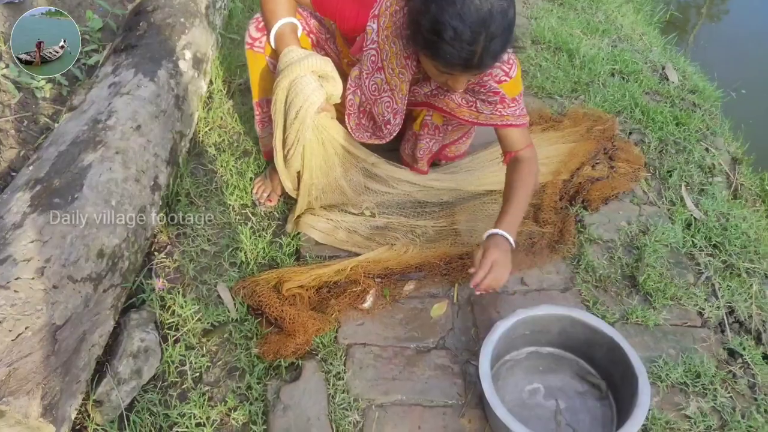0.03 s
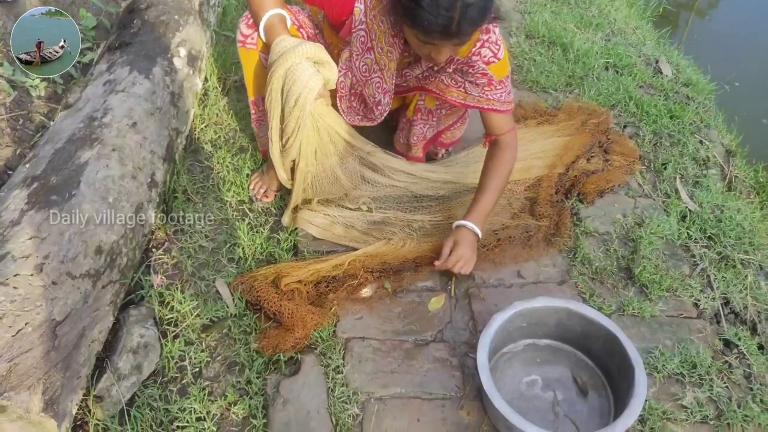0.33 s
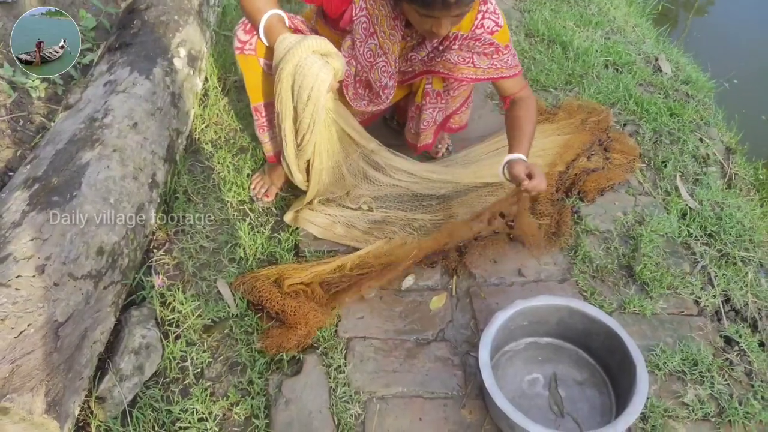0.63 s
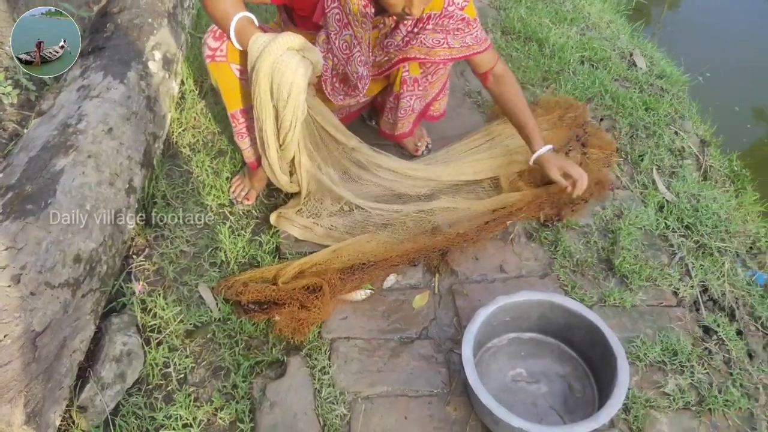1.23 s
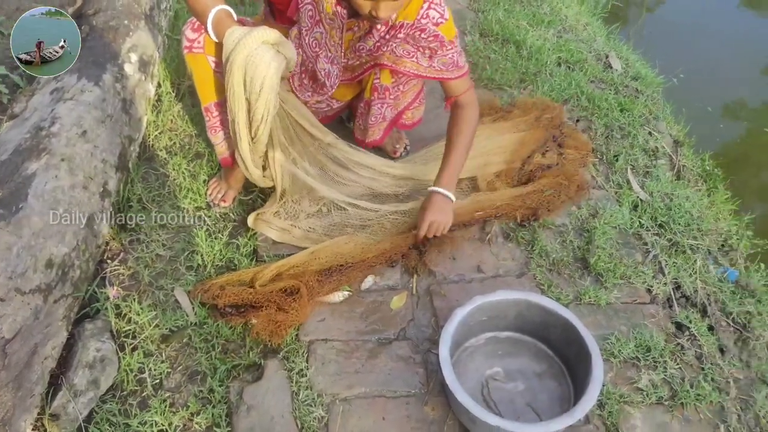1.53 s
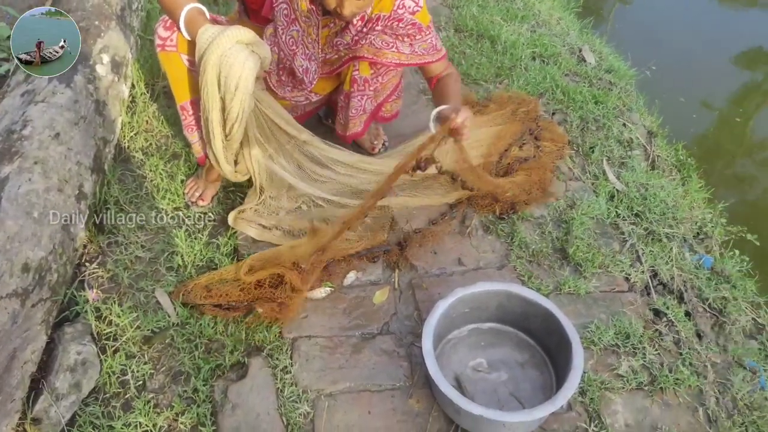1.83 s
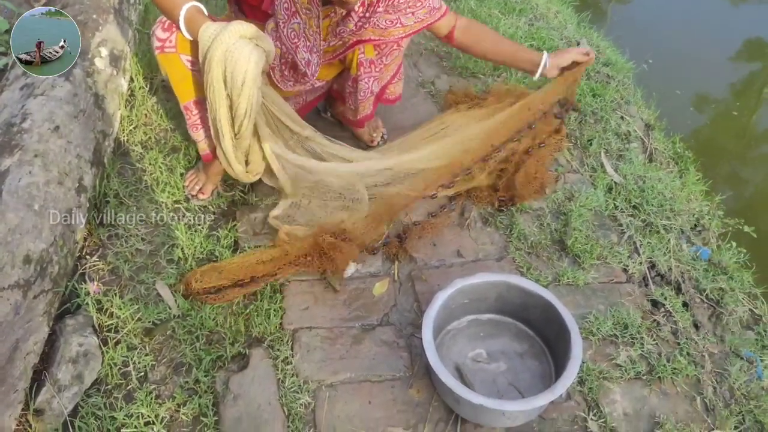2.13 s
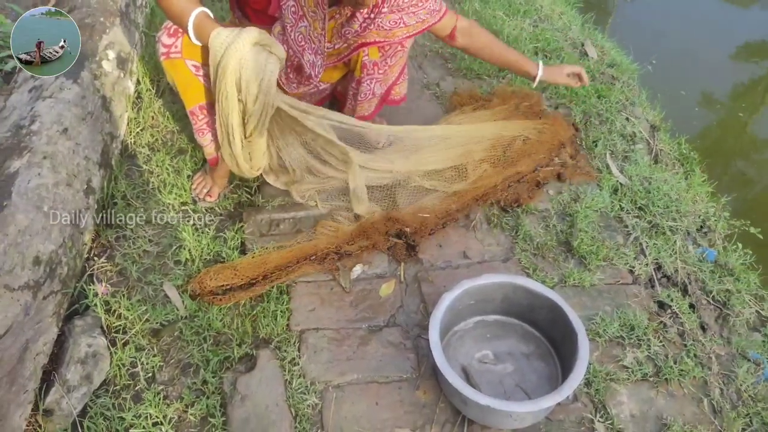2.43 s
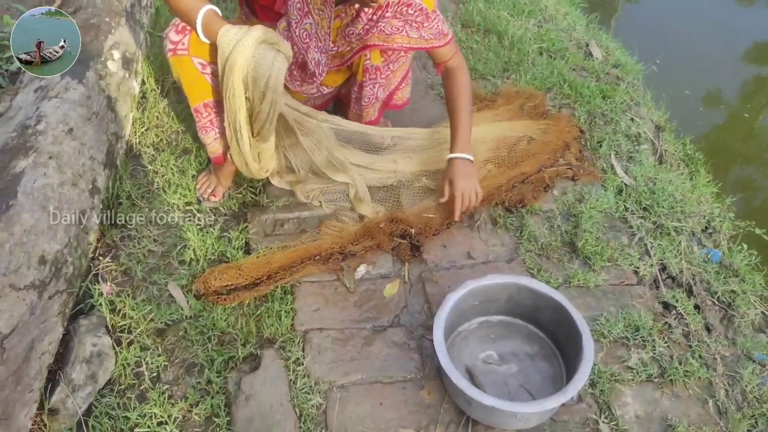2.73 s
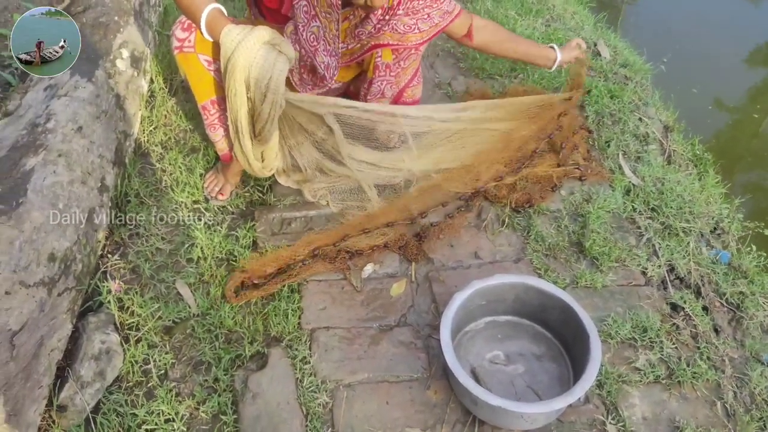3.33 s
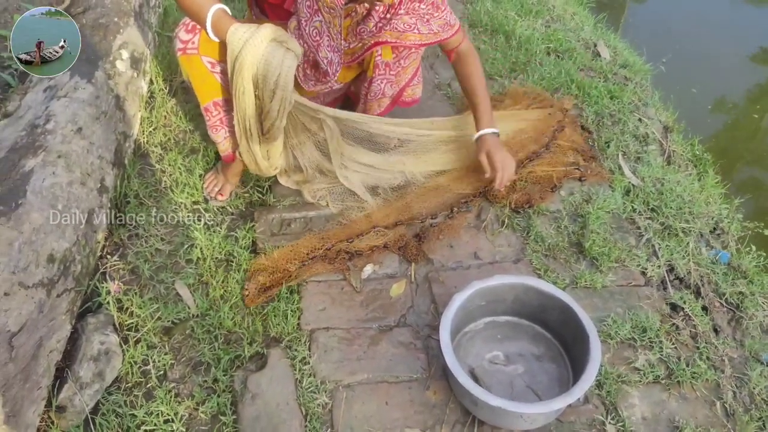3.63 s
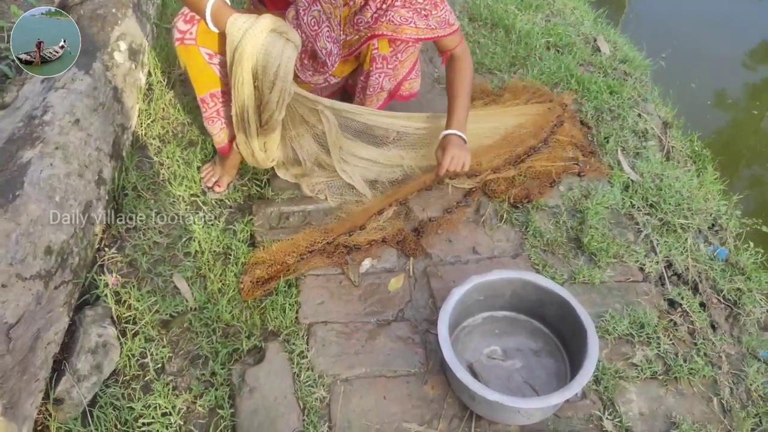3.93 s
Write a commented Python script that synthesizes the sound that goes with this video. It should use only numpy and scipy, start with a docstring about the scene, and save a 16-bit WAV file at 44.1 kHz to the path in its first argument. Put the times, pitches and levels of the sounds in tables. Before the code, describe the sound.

Close by, a weighted net is dragged and lifted over bricks, twine brushing and sinkers clicking together. A fish flaps in a metal pot of water, mostly in the first half, while light gusts buffet the microphone.

```python
"""A cast net is sorted on a brick landing by a pond. Its twine rustles over the bricks, the small metal
sinkers on its edge click together and land in bunches, and its folds slump with a soft thud.
Beside it a live fish flaps in the shallow water of an aluminium pot, throwing spray, stirring up
bubbles and making the pot ring. Light wind buffets the microphone, whose right side is the duller."""
import sys
import numpy as np
from scipy import signal
from scipy.fft import rfft, irfft, next_fast_len
from scipy.io import wavfile
from scipy.ndimage import uniform_filter1d, map_coordinates

SR = 44100
rng = np.random.default_rng(int(sys.argv[2]) if len(sys.argv) > 2 else 0)


def transcribe(signal):
    """Save signal, clipped to [-1, 1], as a 16-bit WAV file at the path in sys.argv[1]."""
    frames = np.atleast_2d(signal).T
    limited = np.clip(frames, -1, 1)
    pcm = np.round(limited * 32767).astype(np.int16)
    wavfile.write(sys.argv[1], SR, pcm)


N = 176400
PAD = SR // 2  # samples in one splash, slap or echo

# tone colour of the net brushing the bricks: f/Hz, level/dB
BRUSH_COLOUR = [(300, -28.5), (800, -30), (1400, -37.5), (2500, -29), (3300, -14), (3950, -21.5),
                (4700, -6), (5500, -7), (6500, -8.5), (7400, -10), (9000, -9.5)]
# the notes at which the pot and its water ring: f/Hz, level/dB, fade time/s
POT_NOTES = [(367.6, -10.5, 0.097), (490, -3.5, 0.058), (737, -18.5, 0.11), (937, -2, 0.08), (996, 1, 0.07),
             (1058.4, -5, 0.14), (1146, -13.5, 0.22), (1548, -7, 0.11), (1640, -12.5, 0.017),
             (2077, -13, 0.15), (3360, -13, 0.045), (3636, -8, 0.076)]


def amp(db):
    """Turns decibels into a gain."""
    return 10 ** (np.asarray(db) / 20)


def unit(x):
    """Scales x to an average strength (rms) of 1."""
    return x / np.sqrt(np.mean(x ** 2) + 1e-20)


def along(points, hz):
    """Reads between (frequency, value) points, spaced by octaves."""
    f, v = np.transpose(points)
    return np.interp(np.log(hz + 1), np.log(f + 1), v)


def curve(rows):
    """One value per sample from (time, value) rows."""
    return np.interp(np.arange(N) / SR, *np.transpose(rows))


def wobble(rate, size=N):
    """A curve that glides to a new random value rate times a second."""
    targets = rng.standard_normal(size + 4)
    return map_coordinates(targets, [np.arange(size) * rate / SR], order=1) * np.sqrt(3 / 2)


def filtered(x, response):
    """Gives each frequency in x the gain response(hz)."""
    n = x.shape[-1]
    m = next_fast_len(n + SR // 8)
    return irfft(rfft(x, m) * response(np.fft.rfftfreq(m, 1 / SR)), m)[..., :n]


def noise(colour, size=N):
    """Noise with a given tone colour, different left and right."""
    return unit(filtered(rng.standard_normal((2, size)), lambda hz: amp(along(colour, hz))))


def patchy(x, depth_db):
    """Makes narrow bands of a noise swell and sink by chance."""
    bands = signal.stft(x, nperseg=1024)[2]
    swell = uniform_filter1d(rng.standard_normal(bands.shape[1:]), size=4, axis=0)
    swell = unit(uniform_filter1d(swell, size=8, axis=1))
    return unit(signal.istft(bands * amp(depth_db * swell), nperseg=1024)[1][:, :N])


def placed(x, left_lead_s):
    """Makes x stereo; a positive lead reaches the left side first."""
    return filtered(x, lambda hz: np.exp(1j * np.pi * hz * left_lead_s * np.array([[1], [-1]])))


def add(track, s, x):
    """Mixes x into the track at s seconds."""
    start = max(0, round(s * SR))
    part = track[..., start:start + x.shape[-1]]
    part += x[..., :part.shape[-1]]


def fade(t, t60):
    """Dies away by 60 dB in the fade time of t60 seconds."""
    return np.exp(-np.log(1000) * np.maximum(t, 0) / t60)


def burst(t, rise, t60):
    """Climbs steadily for rise seconds, then dies away."""
    return np.clip(t / rise, 0, 1) * fade(t - rise, t60)


def net_rustle():
    """Twine brushes the bricks in tiny grains of sound; a harder pull adds a lower grit."""
    # the rustle as the net is dragged and lifted: t/s, level/dB
    drag = [(0, -41.5), (.27, -36.5), (.48, -41), (.62, -36), (.72, -40.5), (.82, -41.5), (.87, -35.5),
            (1.01, -29), (1.12, -43), (1.27, -36.5), (1.46, -45.5), (1.62, -40), (1.76, -49), (1.82, -37.5),
            (1.93, -32), (2.06, -38.5), (2.14, -37), (2.22, -29.5), (2.28, -39), (2.42, -29), (2.47, -36.5),
            (2.64, -54.5), (2.75, -47), (2.86, -51.5), (2.95, -38.5), (3.11, -46.5), (3.19, -33.5),
            (3.29, -40), (3.39, -40), (3.5, -36), (3.68, -42.5), (3.88, -64), (4, -42)]
    # tone colour of the grit: f/Hz, level/dB
    grit_colour = [(500, -7.5), (1300, -9.5), (2200, -1), (4200, -3.5), (6000, -4.5)]
    drag_db = curve(drag)
    hiss = patchy(noise(BRUSH_COLOUR), depth_db=3.5) * amp(drag_db - 0.5)
    grains = unit(amp(2.5 * wobble(rate=900) + 2.5 * wobble(rate=70)))
    grit = noise(grit_colour) * amp(1.5 * drag_db + 2)
    return grains * (hiss + grit)


def wind():
    """Gusts rumble on the microphone over a faint, distant hush."""
    # strength of the gusts: t/s, level/dB
    gusts = [(0, -44.5), (.34, -39.5), (.39, -33), (.65, -54.5), (.71, -29.5), (.8, -35.5), (1.05, -35.5),
             (1.11, -27.5), (1.22, -40), (1.31, -26), (1.37, -31.5), (1.57, -35.5), (1.78, -44.5),
             (1.85, -35), (1.99, -48), (2.16, -33.5), (2.22, -40.5), (2.42, -22), (2.5, -23.5),
             (2.56, -28.5), (2.74, -33), (2.8, -22), (2.87, -29.5), (2.96, -22.5), (3.07, -32),
             (3.25, -37.5), (3.28, -25), (3.42, -32), (3.6, -37), (3.9, -47.5), (4, -39)]
    # tone colour of the rumble: f/Hz, level/dB
    rumble_colour = [(20, -18), (55, -15), (80, -1.5), (128, 3), (170, -4), (230, -13.5), (320, -26),
                     (450, -42.5), (800, -51), (3000, -82)]
    # tone colour of the hush: f/Hz, level/dB
    hush_colour = [(30, -2), (200, -12.5), (500, -0.5), (1200, -23), (3000, -15.5), (8000, -36)]
    rumble = noise(rumble_colour)
    power = uniform_filter1d(np.mean(rumble ** 2, axis=0), size=SR // 36)
    steady = unit(rumble / np.sqrt(np.abs(power) + 1e-9))  # evened out, so the gusts set the level
    return amp(curve(gusts) + 1.98) * steady + amp(-70) * noise(hush_colour)


def fish_splashes():
    """Each flick of the fish throws spray and rubs the pot into ringing."""
    # flicks: t/s, spray level/dB, pot level/dB, rise time/s, fade time/s
    flicks = [(0.013, -12, -27.5, 0.008, 0.12), (0.046, -21, -37, 0.0074, 0.084),
              (0.078, -12.5, -34, 0.00076, 0.12), (.150, -18.5, -55, 0.0027, 0.11),
              (0.157, -18, -33, 0.0024, .14), (0.372, -18, -44, 0.0092, 0.11),
              (.407, -24.5, -46.5, 0.0043, 0.15), (.506, -20.5, -36, 0.0025, 0.077),
              (0.879, -24.5, -48.5, 0.0015, 0.13), (0.888, -30, -44.5, 0.0073, 0.35),
              (1.064, -29, -48.5, 0.0052, 0.2), (1.291, -25.5, -48, 0.0078, 0.091),
              (1.479, -13.5, -26, 0.003, 0.1), (2.656, -37.5, -70.5, 0.0094, 0.28),
              (2.877, -35, -53, 0.0096, 0.14), (3.142, -35.5, -67.5, 0.007, 0.22),
              (3.211, -37.5, -45.5, 0.01, 0.12), (3.565, -30.5, -57, 0.016, 0.12),
              (3.594, -51, -48.5, 0.0065, 0.097), (3.735, -52.5, -53, 0.0033, 0.17),
              (3.903, -39.5, -75, 0.013, 0.24), (3.928, -40, -50, 0.009, 0.14),
              (3.977, -21.5, -43.5, 0.042, 0.32)]
    # how strongly a rub shakes the pot: f/Hz, level/dB
    rub_colour = [(250, -10.5), (600, -10.5), (950, -1), (1550, 4), (2100, 13.5), (3400, 10.5),
                  (5000, -10.5)]
    # tone colour of the spray: f/Hz, level/dB
    spray_colour = [(200, -30), (1000, -23), (2200, -18), (3000, -17.5), (3600, -14.5), (4200, -4),
                    (4900, -1), (5800, 0), (6900, 1.5), (7600, -2), (9000, -5)]
    # high notes of the pot wall, which colour the spray: f/Hz
    wall_notes = [2740, 3720, 4720, 5010, 5460, 5930, 6900]
    t, spray_power, ring = np.arange(PAD) / SR, np.zeros(N), np.zeros(N)
    for s, spray_db, pot_db, rise, t60 in flicks:
        shape = burst(t, rise, t60)
        detune = 1 + 0.0096 * rng.standard_normal(len(POT_NOTES))  # sloshing water shifts the notes
        peaks = lambda f: sum(amp(db) / (1 + ((f - hz * shift) * ring_s / 1.7) ** 2)
                              for (hz, db, ring_s), shift in zip(POT_NOTES, detune))
        rub = filtered(rng.standard_normal(PAD), lambda f: amp(along(rub_colour, f)) * peaks(f))
        add(ring, s, amp(pot_db + 3) * shape * unit(rub))
        add(spray_power, s, (amp(spray_db) * shape) ** 2)
    wall = lambda f: 1 + amp(1.5) * sum(1 / (1 + 1j * (f - hz) / 44) for hz in wall_notes)
    drops = unit(patchy(noise(spray_colour), depth_db=5) * amp(0.5 * wobble(rate=1000)))
    return filtered(drops * np.sqrt(spray_power), wall) + placed(ring, left_lead_s=0.00013)


def tail_slaps():
    """The wet tail smacks the pot, rings it and churns the water; trapped air gives dull plops."""
    # slaps: t/s, level/dB, brightness of the ring/(dB per octave)
    slaps = [(0.0198, -17, -6), (0.045, -23, -1), (.507, -33.5, 1.5), (1.4808, -22.5, -9.5)]
    # tone colour of the wet smack: f/Hz, level/dB
    smack_colour = [(120, -21.5), (300, 0), (800, 1), (1400, -14.5), (2200, -9.5), (4000, -11),
                    (8000, -31.5)]
    # air pockets under the tail: t/s, f/Hz, level/dB, fade time/s
    plops = [(.018, 922, -14, 0.051), (0.02, 220.6, -27, 0.14), (0.0266, 377.5, -11.5, 0.058),
             (.045, 954, -8, 0.02), (.053, 330, -22, 0.052), (1.4812, 464, -13.5, 0.073),
             (1.482, 211.6, -24.5, 0.16)]
    out, t = np.zeros(N), np.arange(PAD) / SR
    for s, db, tilt_db in slaps:
        ring = np.zeros(PAD)
        for hz, note_db, t60 in POT_NOTES:
            gain = amp(note_db + tilt_db * np.log2(hz / 1000) + rng.normal(0, 1))
            waver = 1 + 0.015 * wobble(rate=100, size=PAD)  # moving water bends the note
            cycles = hz * np.cumsum(waver) / SR + rng.random()
            ring += gain * fade(t, t60) * np.sin(2 * np.pi * cycles)
        smack = amp(-6.5) * noise(smack_colour, PAD)[0] * fade(t, t60=0.15)
        add(out, s, amp(db) * (ring + smack + slosh()) * (1 - np.exp(-t / 0.0022)))
    for s, hz, db, t60 in plops:
        add(out, s, amp(db) * np.sin(2 * np.pi * hz * t) * fade(t, t60) * (1 - np.exp(-t / 0.0014)))
    return placed(out, left_lead_s=0.00013)


def slosh(count=36, span_s=0.21, middle_hz=715, spread_octaves=0.713):
    """Churned water makes a dying flurry of bubbles, each rising in pitch."""
    out, t = np.zeros(PAD), np.arange(SR // 20) / SR
    for when, pitch, size in rng.random((count, 3)):
        s = when * span_s
        hz = middle_hz * 2 ** (spread_octaves * (2 * pitch - 1))
        bubble = np.sin(2 * np.pi * hz * t * (1 + 2 * t)) * burst(t, rise=0.0014, t60=0.05)
        add(out, s, (size + 0.5) * fade(s, t60=0.39) * bubble)
    return amp(-11) * out


def sinker_clicks():
    """Sinkers meet with a dead click, then chatter as they rebound; hard clicks stand out most."""
    # sinkers knocking together: t/s, level/dB, f/Hz
    clicks = [(0.2861, -13.5, 5800), (0.6098, -12, 6250), (0.6206, -13, 6250), (0.6924, -16.5, 6190),
              (0.8286, -6, 5180), (0.881, -14, 6050), (1.13, -12, 4960), (1.146, 2, 6060),
              (1.1653, -8, 5650), (1.171, -7.5, 6960), (1.174, -4.5, 6800), (1.1872, -17, 6340),
              (1.8424, -15, 6160), (1.9117, -5.5, 6600), (1.9177, -9, 6900), (1.9488, -2.5, 5560),
              (1.9538, -2.5, 7230), (1.9974, -9.5, 5920), (2.0243, -12.5, 6930), (2.0864, -16, 6100),
              (2.1616, 0.5, 7150), (2.202, -8, 6300), (2.2472, -4, 5850), (2.3268, -3, 6200),
              (2.341, -11, 5300), (2.3472, -7, 6530), (2.371, -7.5, 6150), (2.4347, -10.5, 4220),
              (2.4892, -17, 6260), (3.1794, -16, 5040), (3.3337, -9.5, 6300), (3.357, -1.5, 7570),
              (3.373, -14, 6680), (3.4007, -6.5, 6240), (3.441, -14.5, 5750), (3.4834, -16, 6150),
              (3.4947, -12.5, 6570), (3.5236, -10, 6700), (3.5563, -23, 5150)]
    # tone colour of a click at the usual pitch: f/Hz, level/dB
    click_colour = [(200, -27.5), (900, -25.5), (2000, -23), (3200, -24), (4500, -6), (6000, -3), (7500, 0),
                    (9000, -2.5)]
    out, t = np.zeros((2, N)), np.arange(SR // 12) / SR
    lead_in, usual_hz = SR // 500, np.median([hz for _, _, hz in clicks])
    for s, db, hz in clicks + sinker_jostles():
        # the colour slides with the pitch and has a broad bump around it
        bump = lambda f: 1 + 2 * np.exp(-(np.log2((f + 1) / hz) / 0.98) ** 2)
        tone = lambda f: amp(along(click_colour, f * usual_hz / hz)) * bump(f)
        tick = 0.51 * np.cos(2 * np.pi * hz * t) * fade(t, t60=0.0032) + (t == 0)
        tick = unit(placed(filtered(np.pad(tick, (lead_in, 0)), tone), left_lead_s=-0.0001112))
        chatter = rng.standard_normal((2, len(t))) * amp(2.6 * wobble(rate=900, size=len(t)))
        chatter *= burst(t, rise=0.00053, t60=0.046)
        chatter = unit(filtered(np.pad(chatter, ((0, 0), (lead_in, 0))), tone))
        contact = amp(db) * tick + amp(0.88 * db + 2) * chatter
        add(out, s - 0.0013, contact / np.abs(tick).max())
    return out


def sinker_landings():
    """A bunch of sinkers hits the bricks with a dead knock and settles with a gritty scrape."""
    # landings: t/s, scrape level/dB, knock level/dB
    landings = [(1.1311, -43, -27.5), (1.1468, -48, -23), (1.166, -33, -29.5), (1.173, -26.5, -27),
                (2.292, -18.5, -50), (2.437, -43.5, -29.5)]
    # tone colour of the knock: f/Hz, level/dB
    knock_colour = [(120, -2), (380, 8.5), (700, -3.5), (1100, 6), (1600, -11.5), (2100, -1.5),
                    (4000, -5.5), (8000, -19.5)]
    out, t = np.zeros((2, N)), np.arange(PAD // 2) / SR
    for s, scrape_db, knock_db in landings:
        grit = unit(amp(4 * wobble(rate=600, size=len(t))))
        scrape = noise(BRUSH_COLOUR, len(t)) * grit * burst(t, rise=0.018, t60=0.018)
        knock = noise(knock_colour, len(t))[0] * burst(t, rise=0.001, t60=0.025)
        add(out, s - 0.002, amp(scrape_db) * scrape)
        add(out, s - 0.001, amp(knock_db) * knock)
    return out


def sinker_jostles(per_s=80, level_db=-17, middle_hz=6300):
    """Light ticks run along the swinging edge of the net; gives rows of t/s, level/dB, f/Hz."""
    # swings, silent unless the end comes after the start: start/s, end/s
    swings = [(2.17, 2.2), (2.329, 2.2), (3.419, 3.53)]
    ticks = []
    for start, end in swings:
        for s in np.arange(start, end, 1 / per_s):
            late, pitch = rng.standard_normal(2)
            ticks.append((s + late * 0.5 / per_s, level_db, middle_hz * np.exp(pitch / 10)))
    return ticks


def net_slump(start_s=2.345):
    """The folds of the lifted net pile onto the ground with a soft thud."""
    # tone colour of the thud: f/Hz, level/dB
    thud_colour = [(100, -1), (220, 2.5), (420, -12), (650, -37.5), (1100, -24.5), (1500, -37), (4000, -52)]
    t = np.arange(N) / SR - start_s
    return amp(-29) * noise(thud_colour)[0] * burst(t, rise=0.03, t60=0.37)


def bank_echo(x, delay_s=0.015):
    """The bank and trees scatter back a weak, blurred echo."""
    # tone colour of the echo: f/Hz, level/dB
    echo_colour = [(150, 5.5), (500, -1.5), (1000, 7), (2000, 4.5), (5000, -9), (8000, -11)]
    t = np.arange(PAD) / SR
    tail = rng.standard_normal((2, PAD)) * fade(t, t60=0.39) * np.clip(t / delay_s - 1, 0, 1)
    echo = signal.fftconvolve(x, tail / np.linalg.norm(tail[0]), axes=1)[:, :N]
    return amp(-13) * filtered(echo, lambda hz: amp(along(echo_colour, hz)))


def scene():
    """Knocks and splashes close by with their echo, plus the rustle and the wind."""
    near = sinker_clicks() + sinker_landings() + net_slump() + fish_splashes() + tail_slaps()
    return near + bank_echo(near) + net_rustle() + wind()


def record(dry):
    """The microphone is louder and brighter on the left, rounds hard peaks and cuts the top treble."""
    # how much louder the left side is than the right: f/Hz, level/dB
    left_over_right = [(60, 4.9), (1000, 3.5), (2000, 4), (4000, 12.5), (6000, 15.5), (8000, -0.5)]
    top_hz = 7650
    heard = filtered(dry, lambda hz: amp(along(left_over_right, hz) * np.array([[0.5], [-0.5]])))
    rounded = heard / (1 + heard ** 6) ** (1 / 6)
    return filtered(rounded, lambda hz: 1 / np.sqrt(1 + (hz / top_hz) ** 80))


dry = scene()
out = record(dry)
transcribe(out)
```